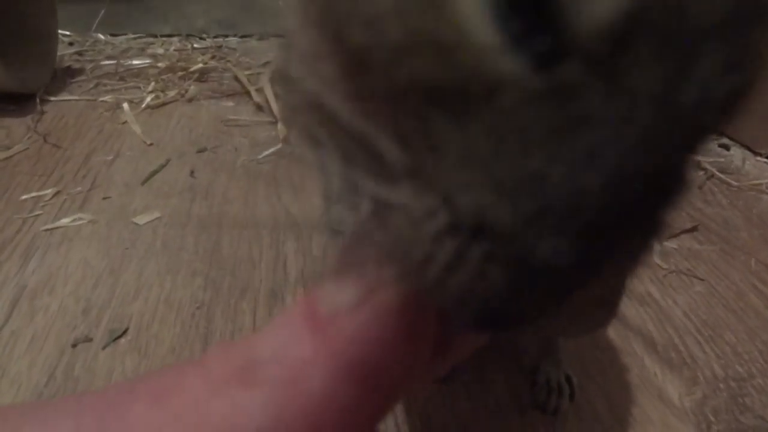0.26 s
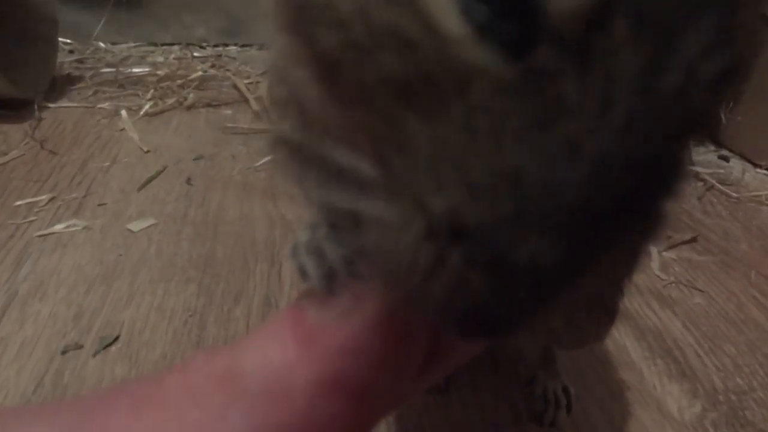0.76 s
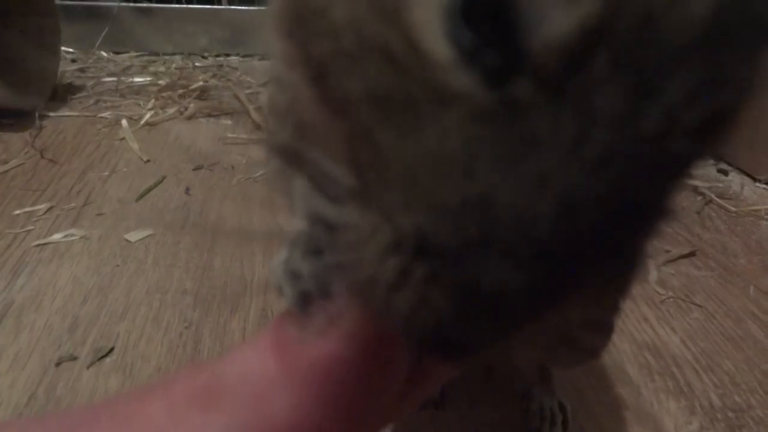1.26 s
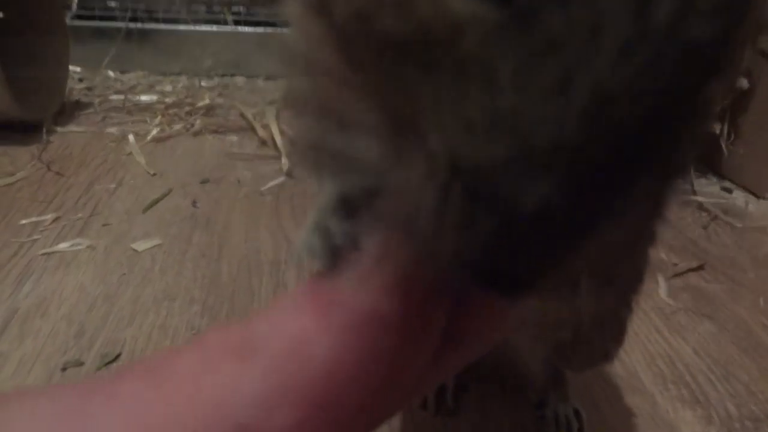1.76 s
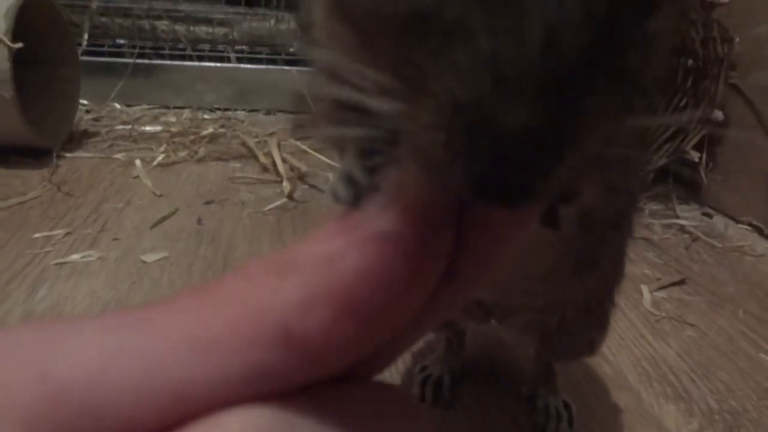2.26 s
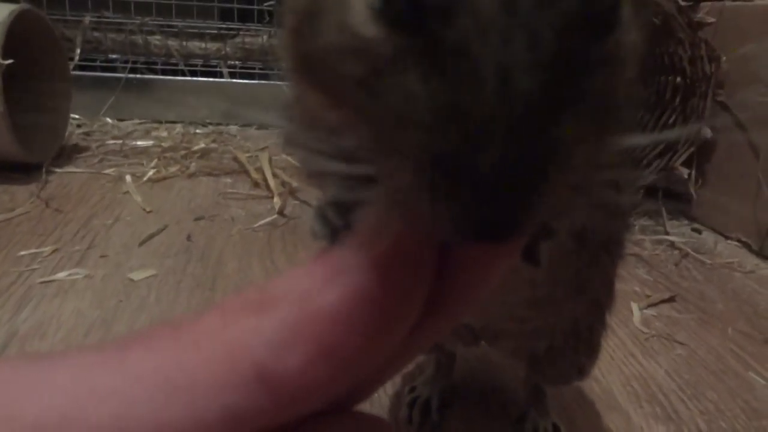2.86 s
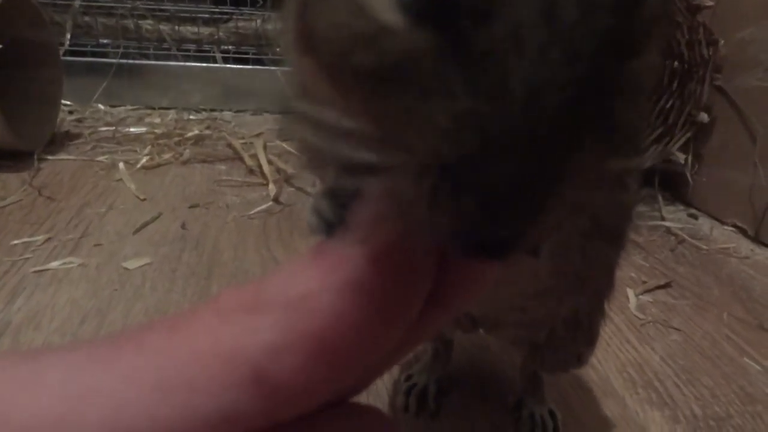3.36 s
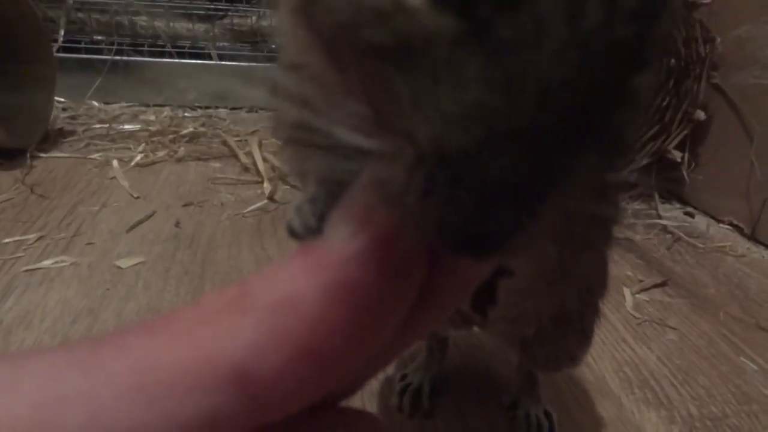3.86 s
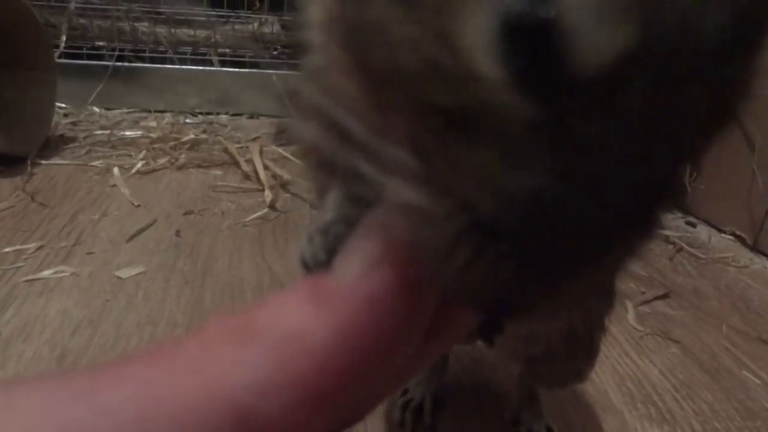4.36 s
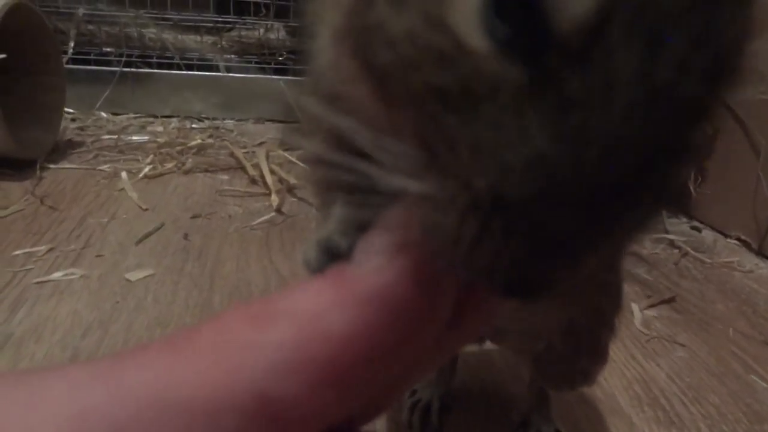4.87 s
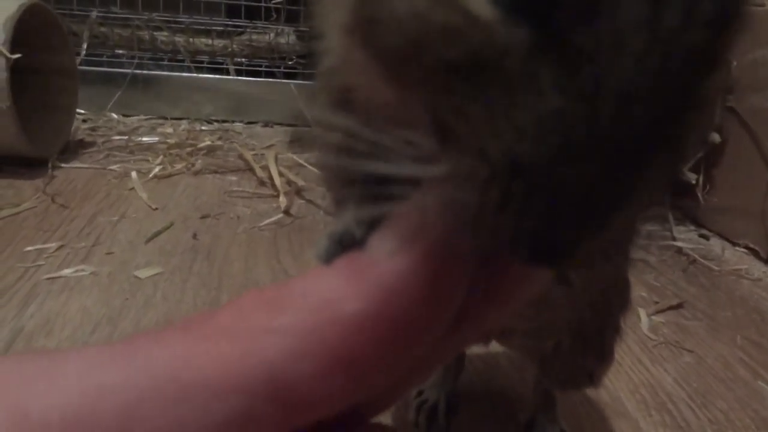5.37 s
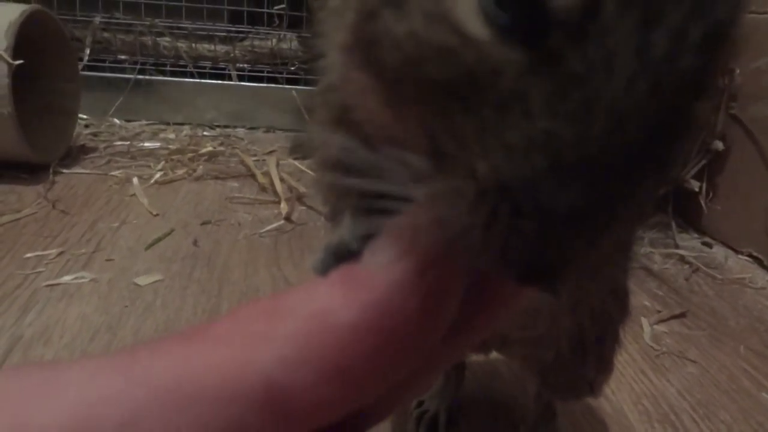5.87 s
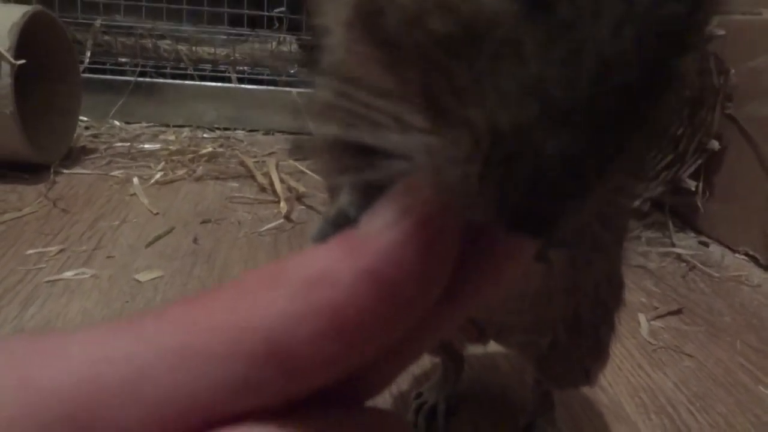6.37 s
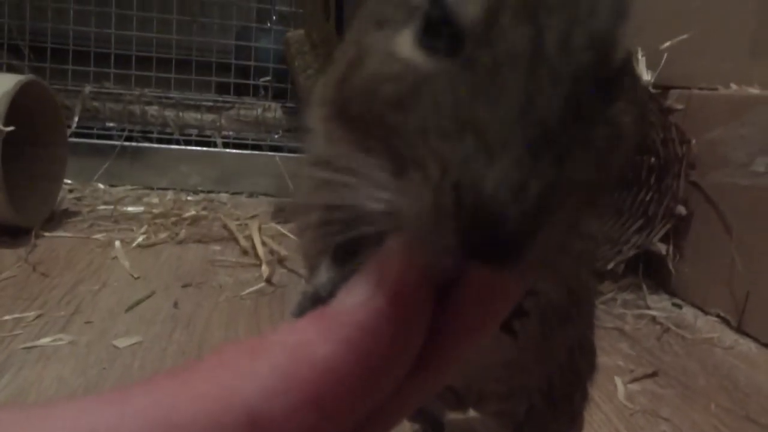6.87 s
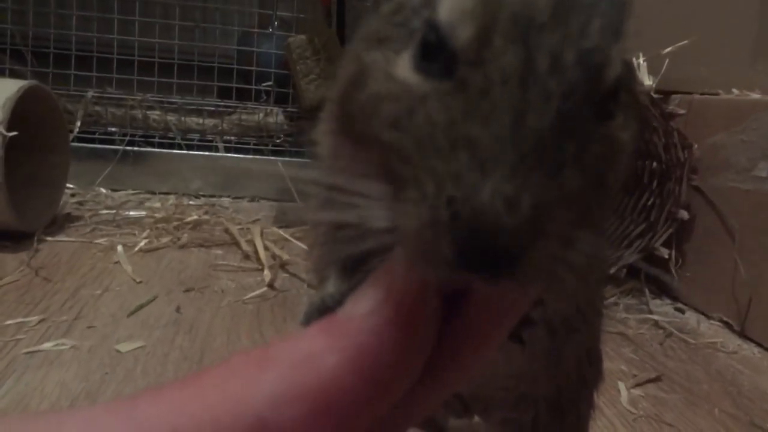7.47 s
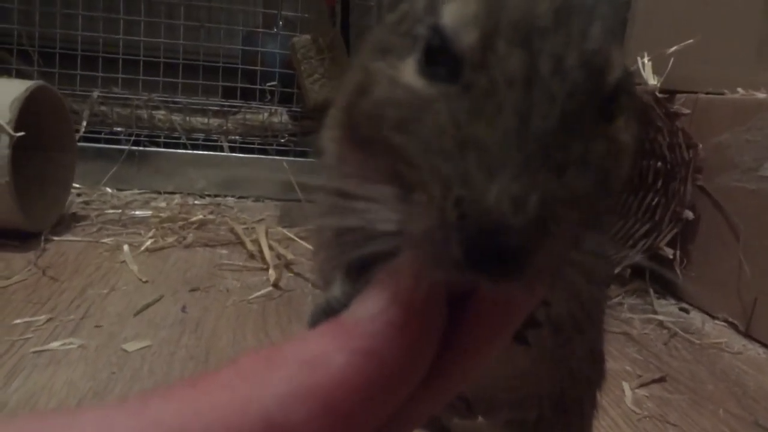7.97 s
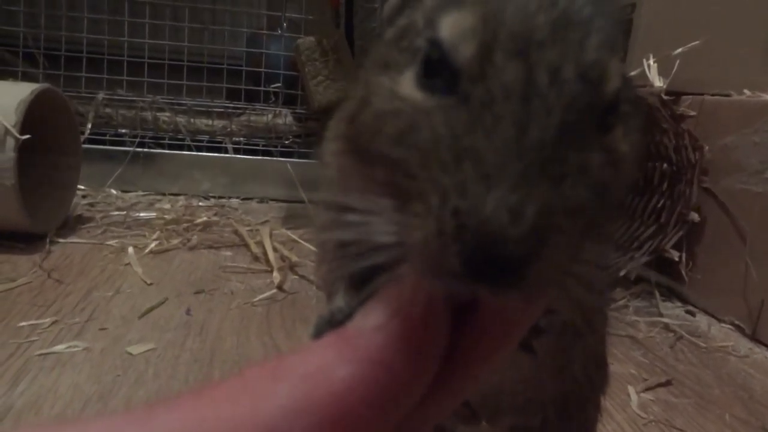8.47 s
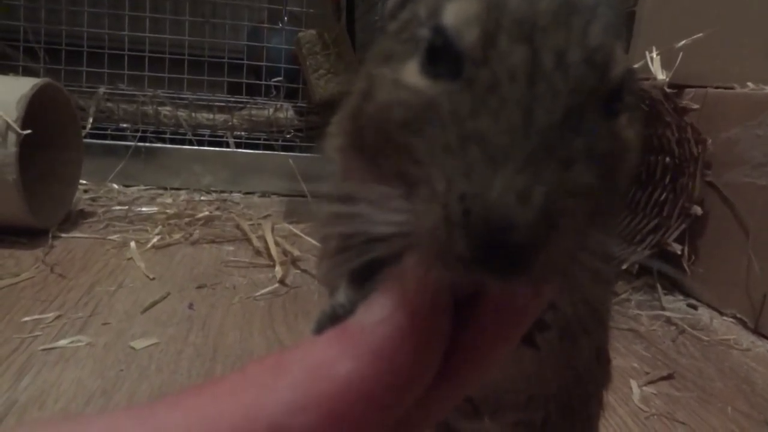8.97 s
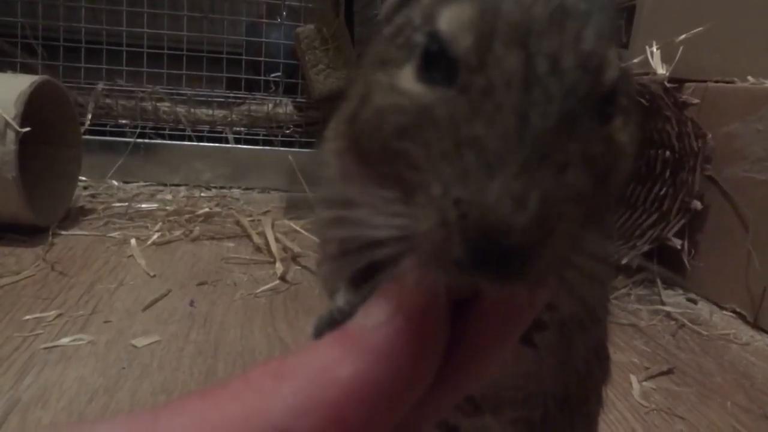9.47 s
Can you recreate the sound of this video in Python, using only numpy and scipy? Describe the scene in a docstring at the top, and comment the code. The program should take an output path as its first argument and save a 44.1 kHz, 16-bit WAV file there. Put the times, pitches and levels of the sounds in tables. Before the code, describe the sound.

Quiet, slightly hollow room hush with small rustles and a dull tick at about 0.2 s. From 0.3 s a small rodent, very close, cracks a dry treat: tiny, bright, brittle snaps with a high ring and a short wooden-cage reflection. They come irregularly, singly and in tight pairs, growing dense and loud from 1.2 to 4.6 s, with faint splitting ticks ahead of some, brief tooth scrapes and soft low bumps through the floor. Crumbs tick and paws shuffle underneath. Duller, hollow ticks, like a cage mate nibbling farther back, show at 0.5-1.1 s and again around 4.3-5.9 s. One strong snap lands near 5.26 s, then close biting pauses. From 6.5 s only sparse, mostly faint clicks and light scrapes remain, with a clearer crisp pair at 7.8 s, a few dull ticks until 8.7 s, and weak clicks at 9.2 and 9.4 s over the hush.

```python
"""A quiet hush, small rustles and a dull tick are heard first; then very short, bright cracks stand out most.
A degu gnaws a dry treat held in its fingers, close by: each crack is a ringing fracture pulse,
reflected by paws and fingers and then by a plywood and wire cage. Teeth scrape in runs of tiny slips,
tugs excite the low modes of the floor, and crumbs tick as paws shuffle. Duller ticks, perhaps a cage mate
nibbling, are hollow tocks and soft edges in reflections from farther back. Stereo noise makes the hush."""
import sys
import numpy as np
from scipy import signal
from scipy.fft import rfft, irfft
from scipy.io import wavfile
from scipy.ndimage import uniform_filter1d

SR = 44100
rng = np.random.default_rng(int(sys.argv[2]) if len(sys.argv) > 2 else 0)


def output_pcm(signal):
    """Save a mono or channel-first signal as 16-bit PCM at the path in sys.argv[1].

    Samples are clipped to [-1, 1] before scaling.
    """
    pcm = np.clip(np.atleast_2d(signal).T, -1, 1) * 32767
    wavfile.write(sys.argv[1], SR, np.round(pcm).astype(np.int16))


N = 428211

# clear snaps of the treat:
# (time [s], energy [dB], ring frequency [Hz], body tilt [dB], treble snap tilt [dB])
SNAPS = [(0.3412, -3, 4480, 7.5, -8), (0.3469, -6.5, 4050, -4, 3), (0.4736, -12.5, 4360, 12.5, 3),
         (0.6687, -25, 4390, -5, 6), (0.7015, -16, 4570, -17, 6.5), (0.9044, -14, 4010, 1, -3),
         (0.9377, -15.5, 4010, -1.5, 3), (1.1116, -9, 4640, 1.5, -3), (1.2262, -4.5, 4520, 9.5, -8.5),
         (1.2864, 4.5, 5200, -0.5, 1.5), (1.293, -3, 5510, -10, 17), (1.4378, -15, 4350, 2, -3),
         (1.5981, -24, 4050, 10, -1), (1.642, -6.5, 4760, 4.5, 0), (1.6775, -8.5, 4660, -1, -8),
         (1.6836, 1.5, 5100, -0.5, 4.5), (1.878, -7, 4440, 5, 0), (1.8936, -0.5, 4260, 0, -2),
         (1.9515, -11, 4050, 3, 1.5), (1.988, -6, 4360, 0, 5.5), (2.0235, -2, 4050, 2.5, 3.5),
         (2.1885, -20, 3660, 7.5, 1.5), (2.328, -19, 4010, 5, -3), (2.3676, 0, 4360, 2.5, 5.5),
         (2.3983, -12.5, 4520, -4, 6), (2.4111, -13, 5120, 1, 11), (2.4712, 4.5, 5300, -1, -1.5),
         (2.6215, -.5, 4220, 0, 3.5), (2.782, -13.5, 3450, 1, -1), (2.8176, 1, 4130, 2.5, 4),
         (2.8768, -12, 4130, -2, -8), (2.8911, -1.5, 4370, -2.5, 3), (3.051, -21, 3620, 15, -4),
         (3.1001, -0.5, 4050, 5, 1), (3.2656, -21.5, 2410, 5, -14), (3.306, -11.5, 4050, 2, 2),
         (3.5064, 2.5, 4100, 5.5, 2.5), (3.7133, 4, 4200, 3.5, -3), (3.7997, 3.5, 4090, -1.5, -0.5),
         (3.946, -13.5, 3880, 2, -5), (3.9663, -16, 3450, 1, -13), (3.97, 3, 3980, 3, -2.5),
         (4.0393, -11.5, 4010, -3, 6), (4.045, 1.5, 4050, 10, 15.5), (4.2223, -17, 4010, -7, 3),
         (4.2304, 4, 3800, -0.5, -2.5), (4.3817, -9, 3970, 3.5, -8), (4.4142, -2, 4020, -4, -3.5),
         (4.5464, -12, 3360, 2, -7), (4.5577, -4.5, 3840, 3, -13), (4.58, -8.5, 2360, 1, 0),
         (5.1024, -20.5, 3960, -8, 2), (5.12, -20, 3960, -2, 1), (5.257, -13, 4130, 1, 12),
         (5.259, 2.5, 4080, 0, -8), (6.5259, -22.5, 4100, 13.5, -25), (6.886, -9.5, 4060, -10, -0.5),
         (7.0071, -22, 5250, -12, 1), (7.0377, -14, 4450, -3, -1), (7.2785, -23.5, 4640, -1, -6),
         (7.5272, -10.5, 4260, -1, -21), (7.55, -21.5, 5340, -11, -7), (7.6292, -22.5, 4440, 9, -3),
         (7.7921, -8.5, 5440, -9, -7), (7.7946, -3.5, 5400, -0.5, -2), (7.9651, -22.5, 4300, -3, -5),
         (8.0413, -26, 4260, -20, -3), (8.1109, -21.5, 5030, -2, -4), (9.2374, -22, 5100, 11, -15),
         (9.4333, -21.5, 5360, -28, -11)]
# colour of a crack through teeth, mouth and fingers: (frequency [Hz], level [dB])
CRACK_COLOUR = [(150, -16.5), (450, -8.5), (850, -2), (1350, 2.5), (1750, -2), (2400, 5), (4000, 6.5),
                (5200, 0), (6500, -4.5), (8700, -3), (9600, -1), (13000, 1.5), (14800, -2.5), (16500, -15)]
# colour that the cage adds to the sound it throws back: (frequency [Hz], gain [dB])
CAGE_COLOUR = [(200, 4), (800, 1.5), (1400, -6), (2000, 7), (2600, -3.5), (4000, -1.5), (5100, 3),
               (7000, 1), (10000, -1.5), (13000, -4.5), (16000, -6)]
# how far the head is raised clear of the fingers: (time [s], share [0-1])
HEAD_UP = [(6.5, 0.06), (7.3, 0.99)]
# what a fully raised head does to a crack: (frequency [Hz], gain [dB])
HEAD_UP_COLOUR = [(1000, 2.5), (2200, -1), (3000, -4), (4200, 0), (6000, 7), (8000, 3.5), (11000, -3.5),
                  (15000, 2)]


def cracks(rows, ring_db=8.0, ring_width_hz=430, ring_in_echo=0.66, ripple_db=1.52,
           near_db=-9, echo_db=-14.0, splinter=0.32, splinter_s=0.000617, first_db=-29, first_s=.003):
    """Brittle fracture: a snap and a few splinters, with early reflections and a diffuse cage echo."""
    out, hz = np.zeros((2, N)), bins(size=1024)
    walls = scatter(t60=0.2, rise=0.0021, side_db=-15)  # paths that stay the same from bite to bite
    for s, db, ring_hz, body_db, snap_db in rows:
        tilt = [(1500, body_db), (2300, 0), (5500, 0), (10000, snap_db)]
        raised = np.interp(s, *np.transpose(HEAD_UP))
        colour = read(CRACK_COLOUR, hz) + read(tilt, hz) + raised * read(HEAD_UP_COLOUR, hz)
        ring = ring_db * peak(hz, ring_hz, ring_width_hz)  # the piece between the teeth rings
        shape = ripple_db * ripple(count=len(hz), order=9)  # every break has its own shape

        # three splinters follow as delayed copies, written as phase turns
        lag = splinter_s * rng.uniform(0.14, 1, 3)
        strength = splinter * rng.uniform(-0.51, 1, 3)
        fracture = 1 + strength @ np.exp(-2j * np.pi * lag[:, None] * hz)
        pulse = click(colour + ring + shape)
        snap = -amp(db) * unit(irfft(rfft(pulse) * fracture))

        # a much fainter copy of the snap sounds a few milliseconds ahead
        add(out, s - first_s * rng.uniform(0.41, 1), amp(first_db) * snap)
        add(out, s, snap * amp([[.25], [-.25]]))  # left and right gains in dB
        near = scatter(t60=0.02, rise=0.0013, side_db=-9)  # paws and fingers
        add(out, s, amp(near_db) * through(snap, near))

        # the cage gathers sound sent in every direction, so the fine peaks average out
        echo_colour = colour + ring_in_echo * ring + shape / 4 + read(CAGE_COLOUR, hz)
        diffuse = amp(db + echo_db) * click(echo_colour)
        cage = unit(walls + scatter(t60=0.18, rise=0.0038, side_db=-21))
        add(out, s, through(diffuse, cage))
    return out


# as the teeth close, a faint crack may run ahead of a snap: how likely, how far ahead, how strong
LEAD_CHANCE, LEAD_MIN_S, LEAD_MAX_S = .55, .008, .04
LEAD_DB, LEAD_FOLLOWS, LEAD_SPREAD_DB = -26, 0.39, 1.5  # FOLLOWS: dB per dB of the snap


def lead_cracks():
    """Precursor fracture: rows like SNAPS, where the same piece splits faintly before it snaps."""
    rows = []
    draws = rng.random((len(SNAPS), 3))
    for (s, db, *colour), (chance, ahead, vary) in zip(SNAPS, draws):
        if chance < LEAD_CHANCE:
            lead_s = LEAD_MIN_S + ahead * (LEAD_MAX_S - LEAD_MIN_S)
            lead_db = LEAD_DB + LEAD_FOLLOWS * db + LEAD_SPREAD_DB * (2 * vary - 1)
            rows.append((s - lead_s, lead_db, *colour))
    return rows


# incisors scraping over the treat: (time [s], length [s], energy [dB])
SCRAPES = [(1.194, 0.022, -43), (1.273, .014, -25), (2.166, .03, -30), (2.313, .025, -31),
           (3.036, 0.036, -28), (3.24, .03, -35), (6.803, 0.043, -30.5), (6.95, .012, -30.5),
           (7.372, 0.018, -31.5), (8.95, 0.045, -33.5)]


def scrapes(slips_per_s=900, ring_hz=4150, ring_width_hz=400, ring_db=12):
    """Stick-slip friction: a tooth drags over the treat in a quick run of tiny random slips."""
    out, hz, t = np.zeros((2, N)), bins(size=1024), np.arange(4000) / SR
    slip = click(read(CRACK_COLOUR, hz) + ring_db * peak(hz, ring_hz, ring_width_hz))
    for s, length, db in SCRAPES:
        stroke = np.sin(np.pi * np.minimum(t / length, 1))
        strengths = stroke * rng.standard_normal(len(t))
        slips = strengths * (rng.random(len(t)) < slips_per_s / SR)
        reflections = scatter(t60=0.026, rise=.0005, side_db=-21)
        add(out, s, amp(db) * unit(through(through(slips, slip), reflections)))
    return out


# modes of the plywood floor: (nominal frequency [Hz], mean relative level [dB], t60 [s])
FLOOR_MODES = [(62, -17, 0.21), (94, -5.5, 0.16), (122.3, 1, 0.091), (172, -2, 0.13), (235.6, -7, 0.089),
               (353, -5, 0.06)]
# how hard the animal pulls at the treat: (time [s], relative level [dB])
PULL = [(0.34, -34), (0.5, -49), (0.92, -49), (1.11, -35), (1.6, -41), (1.9, -36.5), (2.4, -41.5),
        (3.05, -35.5), (3.55, -40.5), (4.0, -40), (4.23, -51), (4.42, -33), (5.0, -53), (5.26, -43),
        (6.0, -66)]
BRACE_S, TUG_LEAD_S = 0.042, .003  # time constant of bracing again; the tug starts before the treat gives


def bumps(level_db=-3, rise=0.0053, modes_vary_db=3):
    """Modal excitation: each bite tugs on the plywood; a snap close behind another tugs less."""
    out, t = np.zeros((2, N)), np.arange(9000) / SR
    hz, mode_db, t60 = np.transpose(FLOOR_MODES)[:, :, None]
    times = np.transpose(SNAPS)[0]
    for s, rest in zip(times, np.diff(times, prepend=0)):
        braced = 1 - np.exp(-rest / BRACE_S)
        pull = amp(np.interp(s, *np.transpose(PULL)) + level_db) * braced
        detune, vary, phase = rng.standard_normal((3, len(hz), 1))
        decay = amp(mode_db + modes_vary_db * vary - 60 * t / t60)
        modes = decay * np.sin(2 * np.pi * (hz * (1 + 0.06 * detune) * t + phase))
        bump = modes.sum(0) * (1 - np.exp(-(t / rise) ** 2))
        add(out, s - TUG_LEAD_S, pull * bump / abs(bump).max())
    return out


# how busily paws, fur and crumbs move: (time [s], relative level [dB])
FUSS = [(0, 1), (.7, -3.5), (1.4, 6.5), (2.2, 1.5), (2.7, -11), (3.3, 7), (3.7, 1), (4.7, 5), (4.9, 3),
        (5.3, 7), (5.55, 2), (6.6, -30), (7.2, -8), (8.8, -4.5), (9.7, -24)]


def fuss(crumbs_per_s=26, crumb_db=-43, size_db=2.5, shuffle_db=-67):
    """Random impacts and friction noise: crumbs and straw tick while paws shuffle on the boards."""
    hz = bins(size=1024)
    busy = amp(np.interp(np.arange(N) / SR, *np.transpose(FUSS)))
    crumbs = np.zeros((1, N))
    for _ in range(8):  # eight kinds of crumb share the rate
        sizes = amp(size_db * np.minimum(rng.exponential(1, N), 3))
        hits = sizes * (rng.random(N) < crumbs_per_s / 8 / SR)
        tick = click(read(CRACK_COLOUR, hz) + 5 * ripple(count=len(hz), order=30))
        crumbs += through(hits * np.sqrt(busy), tick)[:, :N]
    reflected = through(crumbs, scatter(t60=0.088, rise=.0015, side_db=-14))[:, :N]
    crumbs = amp(crumb_db) * (crumbs + 0.63 * reflected)

    # (frequency [Hz], relative level [dB])
    boards = [(20, -23), (45, -8.0), (110, -4.5), (190, -13), (350, -14), (1500, -25), (8000, -65.5)]
    spectrum = rfft(rng.standard_normal(N)) * amp(read(boards, bins(size=N)))
    shuffle = np.sqrt(N) * unit(irfft(spectrum, N))
    lumps_db = 3 * ripple(count=N, order=2200)  # slow unevenness in time
    return crumbs + amp(shuffle_db + lumps_db) * busy * shuffle


# colour of the dull ticks: (frequency [Hz], level [dB])
TICK_COLOUR = [(300, -12), (1100, -12.5), (1550, -6.5), (1900, 1.5), (2300, -3.5), (2800, -4.5),
               (3400, -3.5), (4600, 0), (5600, -8), (7000, -17), (9500, -21.5), (11500, -19.5),
               (16000, -29)]


def ticks(rows, tail_db=-4, tock_db=-26.5, tock_hz=1850, tock_t60=0.02, tock_follows=0.59):
    """Distance lowers the direct share: a hollow tock and a weak dull edge in stronger reflections."""
    out, hz, t = np.zeros((2, N)), bins(size=1024), np.arange(3000) / SR
    for s, db in rows:
        colour = read(TICK_COLOUR, hz)
        edge = click(colour + 2.4 * ripple(count=len(hz), order=12))
        size = amp(db)
        early = through(edge, scatter(t60=0.068, rise=0.00035, side_db=-12.5))
        tail = through(click(colour), scatter(t60=0.23, rise=0.0062, side_db=-13))
        add(out, s + 0.00198, 0.37 * size * edge)
        add(out, s + .002, size * early)
        add(out, s + .002, size * amp(tail_db) * tail)

        # the tock gains only tock_follows dB per dB, so a gentle tick holds a larger share of ring
        pitch_hz = tock_hz * (1 + 0.036 * rng.standard_normal())
        tock = amp(tock_db - 60 * t / tock_t60) * np.sin(2 * np.pi * pitch_hz * t)
        add(out, s + 0.001916, amp(tock_follows * db) * tock * (1 - np.exp(-t / 0.00067)))
    return out


# the clearer dull ticks from the back of the cage: (time [s], relative level [dB])
FAR_TICKS = [(0.2208, -16.5), (0.6541, -22.5), (0.8258, -17.5), (0.968, -29.5), (1.1148, -17.5),
             (4.281, -18), (4.4686, -23.5), (4.6563, -20), (4.8605, -15.5), (5.0457, -21.5), (5.3431, -23),
             (5.4938, -15.5), (5.6432, -25.5), (5.8098, -23), (5.8512, -19.5), (7.652, -24),
             (8.4625, -20.5), (8.6372, -25.5), (8.7318, -15.5)]
# runs of faint far chewing: (start [s], end [s])
CHEW_RUNS = [(0.479, 1.0), (1.48, 2.25), (4.98, 5.8)]
CHEWS_PER_S, CHEW_JITTER_S, CHEW_DB, CHEW_SPREAD_DB = 5.8, 0.023, -28, 6  # mean pace and level, deviations


def faint_chews():
    """Jittered periodicity: rows like FAR_TICKS, a jaw working at an uneven pace."""
    runs = [np.arange(start, end, 1 / CHEWS_PER_S) for start, end in CHEW_RUNS]
    beats = np.concatenate(runs)
    draws = rng.standard_normal((len(beats), 2))
    return [(s + CHEW_JITTER_S * late, CHEW_DB + CHEW_SPREAD_DB * vary)
            for s, (late, vary) in zip(beats, draws)]


# spectrum of the quiet room: (frequency [Hz], relative level per Hz [dB])
HUSH = [(15, -54), (25, -23), (56, -9), (153, -4), (236, -5), (263, -6.5), (545, -12), (641, -11),
        (734, -11.5), (1040, -13.5), (1520, -16), (1790, -14.5), (2840, -19), (7510, -23), (16000, -29)]
HUSH_DB = -60  # level of the part that both sides share
# left-right likeness before the opposed part is lowered: (frequency [Hz], likeness [-1 to 1])
HUSH_SAME = [(60, 0.75), (130, 0.54), (290, -0.18), (640, -0.55), (1410, -0.36), (3100, 0.035),
             (6820, 0.66), (15000, 1)]
# hollow resonances that the cage adds: (frequency [Hz], half width [Hz], gain [dB])
HOLLOWS = [(448, 57, 3.5), (1080, 140, 2), (2140, 200, 1.5), (5300, 320, 1)]


def hush(level_db=0):
    """Partly coherent noise: steady room noise in the cage, less alike left to right in the low middle."""
    hz = bins(size=N)
    same = np.clip(read(HUSH_SAME, hz), -1, 1)
    hollow = sum(db * peak(hz, centre, width) for centre, width, db in HOLLOWS)
    colour = read(HUSH, hz) + hollow
    mid, side = rfft(rng.standard_normal((2, N))) * amp(colour)
    side *= np.sqrt((1 - same) / (1.001 + same))
    mid, side = irfft(mid, N), irfft(side, N)
    return amp(HUSH_DB + level_db) * spread(mid, side, side_db=-1) / mid.std()


def amp(db):
    """Logarithmic level: decibels to gain."""
    return 10 ** (np.asarray(db) / 20)


def read(points, hz):
    """Spectral envelope: (frequency [Hz], value) joined by straight lines on a log-frequency axis."""
    f, value = np.transpose(points)
    return np.interp(np.log(hz + 1), np.log(f + 1), value)


def bins(size):
    """Discrete spectrum: the frequencies [Hz] for this many samples."""
    return np.fft.rfftfreq(size, 1 / SR)


def peak(hz, centre_hz, width_hz):
    """Resonance curve: a bump of height one, halved at width_hz from its centre."""
    return 1 / (1 + ((hz - centre_hz) / width_hz) ** 2)


def ripple(count, order):
    """Smoothed randomness: peaks and dips over count points, each about order points wide."""
    z = uniform_filter1d(uniform_filter1d(rng.standard_normal(count), order), order)
    return z / z.std()


def unit(x):
    """Energy normalization: scales a sound to a mean energy of one a channel."""
    return x / np.sqrt(np.mean(np.sum(x ** 2, -1)) + 1e-20)


def click(db):
    """Minimum phase: the sharpest causal pulse with this spectrum, by folding its cepstrum."""
    cepstrum = irfft(np.log(amp(db)))
    half = len(cepstrum) // 2
    cepstrum[1:half] *= 2
    cepstrum[half + 1:] = 0
    return unit(irfft(np.exp(rfft(cepstrum))))


def spread(mid, side, side_db):
    """Mid-side stereo: a shared part and an opposed part lowered by side_db."""
    return np.array([mid + amp(side_db) * side, mid - amp(side_db) * side])


def scatter(t60, rise, side_db, size=12000):
    """Diffuse reflection: a dense stereo spray that swells and dies away."""
    t = np.arange(size) / SR
    envelope = amp(-60 * t / t60) * (1 - np.exp(-(t / rise) ** 2))
    paths = rng.standard_normal((2, size)) * envelope
    return unit(spread(*paths, side_db))


def through(x, response):
    """Linear filtering: convolves along time."""
    return signal.fftconvolve(np.atleast_2d(x), np.atleast_2d(response), axes=1)


def add(mix, s, sound):
    """Superposition: mixes a sound in at time s."""
    part = mix[:, max(round(s * SR), 0):][:, :sound.shape[-1]]
    part += sound[..., :part.shape[1]]


def scene():
    """Superposition of all the sounds of the cage."""
    near = cracks(SNAPS) + scrapes() + bumps() + fuss()
    far = ticks(list(FAR_TICKS) + faint_chews())
    return near + hush() + far + cracks(lead_cracks())


EDGE_HZ = 16300  # upper edge of the band


def record(dry, ceiling=0.69):
    """Soft saturation: overload rounds off the sharpest snaps; a low-pass then limits the band."""
    rounded = dry / (1 + (dry / ceiling) ** 4) ** (1 / 4)
    lowpass = signal.firwin(127, EDGE_HZ, window=("kaiser", 8), fs=SR)
    return signal.oaconvolve(rounded, lowpass[None], "same")


dry = scene()
out = record(dry)
output_pcm(out)
```